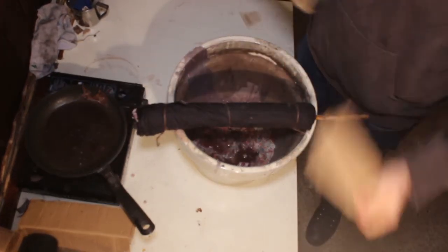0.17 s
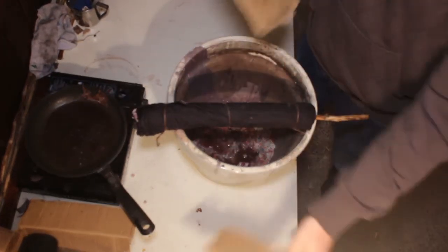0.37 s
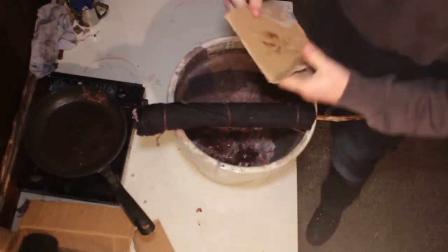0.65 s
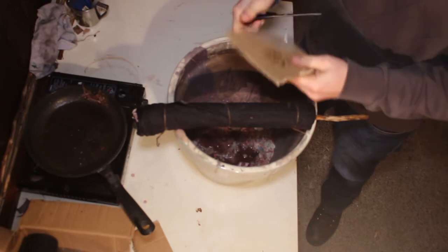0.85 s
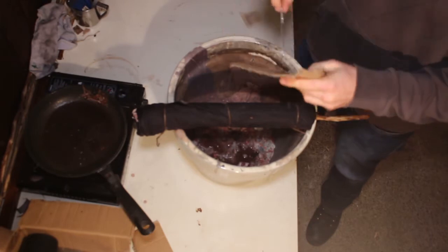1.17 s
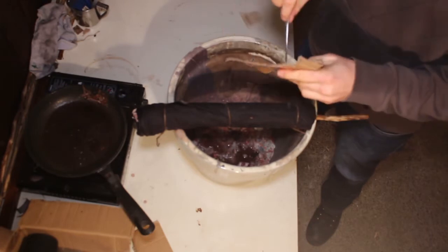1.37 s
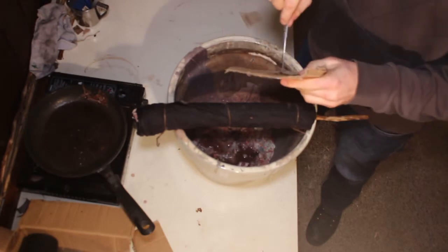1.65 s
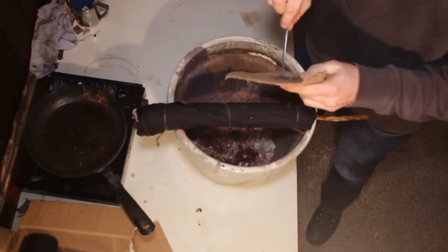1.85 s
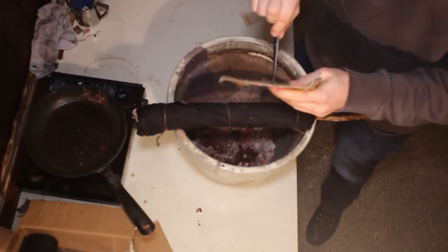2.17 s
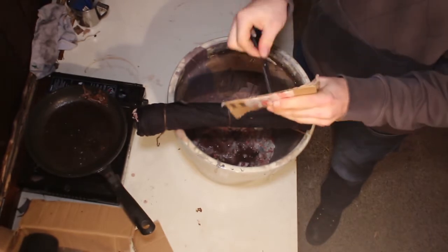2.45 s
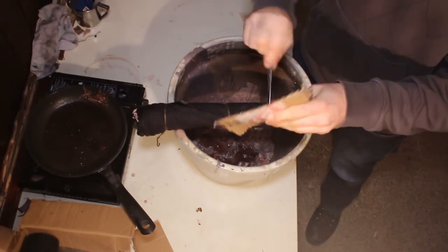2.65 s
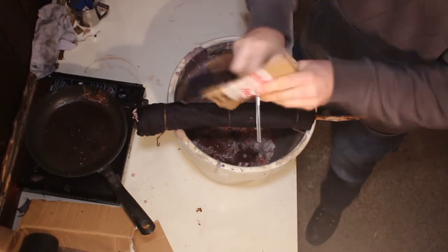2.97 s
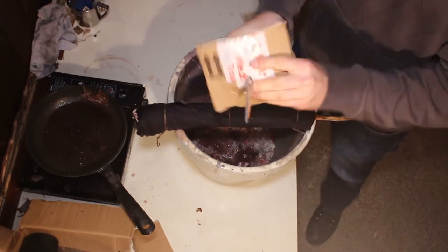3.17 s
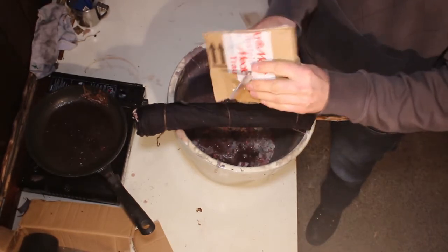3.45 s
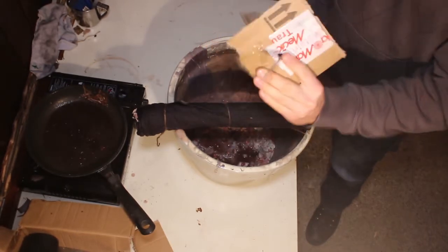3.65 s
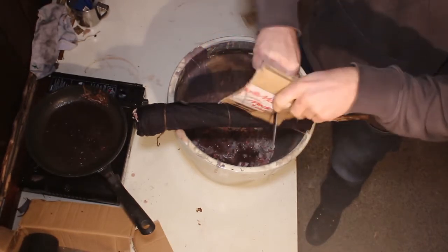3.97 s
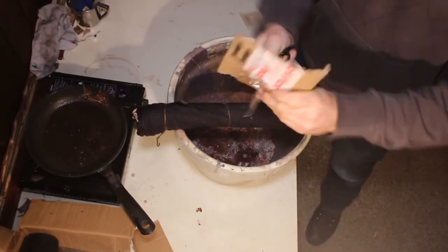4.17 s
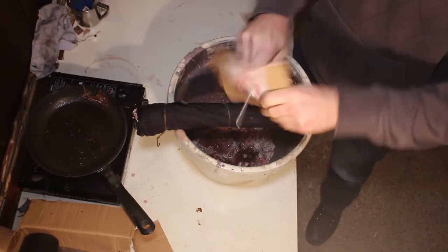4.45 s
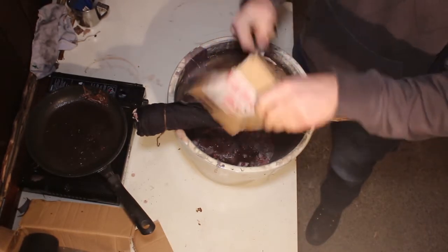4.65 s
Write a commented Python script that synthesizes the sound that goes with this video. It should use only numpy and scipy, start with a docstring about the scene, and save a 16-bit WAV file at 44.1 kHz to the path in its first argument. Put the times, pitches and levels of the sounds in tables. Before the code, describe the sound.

Abrupt cardboard rip and a knock, quiet handling, then a sharp knife stab punching through, followed by scratchy scrapes and small fibre snaps.

```python
"""A rip is heard first: a piece of hand-held corrugated cardboard is torn free by a knife, then tossed aside.
The point pricks the next, pops its liner, bursts through; the blade twists and is drawn out in short scrapes.
Fractures, friction and snapping fibres are shaped noise bursts driving board spectra; struck notes add pitch.
Decaying sines give the room's boom and wavering sines the faint ring of steel, over steady background noise.
A diffuse tail surrounds the board's sounds, as in a small, hard-walled room."""
import sys
import numpy as np
from scipy import signal
from scipy.fft import rfft, irfft
from scipy.io import wavfile
from scipy.ndimage import map_coordinates

SR = 44100
rng = np.random.default_rng(int(sys.argv[2]) if len(sys.argv) > 2 else 0)


def pcm_store(signal):
    """Save signal as 16-bit PCM."""
    levels = np.round(np.clip(np.atleast_2d(signal), -1, 1) * 32767)
    wavfile.write(sys.argv[1], SR, levels.astype(np.int16).T)


N = 212011

# Sudden fractures and knocks of the board; the layer levels are relative to strength_db:
# peak_s, rise_s, strength_db, flex_db, fibre_db, boom_db, note_db, note_hz
FRACTURES = [ (0.019, 0.022, -17, -12.5, 2.5, -1.5, 11.5, 607), (0.029, 0.016, -14, -32, -4, -11, 8.5, 226),
             (0.061, 0.013, -9, -12.5, -6, -13.5, -4.5, 524),
             (0.094, 0.016, -17, -17, -4, -14.5, -2.5, 1790), (0.551, 0.0012, -22, 4, -14, -4.5, 5, 263),
             (0.561, 0.00064, -28, 7, 8.5, -15, 9, 326), (0.590, 0.0018, -18, 3.5, 1, -6.5, 1, 1540),
             (0.608, 0.0026, -29, 5.5, -9, -7, 14.5, 324), (0.738, 0.00094, -29, 5.5, -1.5, -35, 2.5, 860),
             (1.304, 0.0028, -21.5, -3.5, -6.5, -30, -2.5, 940),
             (1.593, 0.014, -27, -7, -11.5, -41, 0, 970), (1.643, 0.0046, -36.5, 1.5, -18, -25, -2, 1070),
             (1.904, 0.0024, -34.5, -1.5, 1, -26.5, -1.5, 650),
             (2.078, 0.0011, -12.5, -4, -9, -13.5, 3, 880),
             (2.082, 0.0031, -19, -0.5, -0.5, -8.5, 10.5, 1293),
             (2.892, 0.0014, -26, -16, 0, -30, 0.5, 2960), (2.917, 0.004, -14, -8, -7, -24, -7, 1200),
             (2.926, 0.0029, -15.5, -6.5, -0.5, -20, 0.5, 1210),
             (2.947, 0.003, -4.5, -3, -5.5, -19, 2.5, 2400),
             (2.953, 0.0045, -4.5, -9, -4.5, -16.5, 2.5, 1470),
             (3.369, 0.0027, -35, -2, -1.5, -18, 3.5, 950), (3.579, 0.00077, -11, -6, -3, -30, 1, 1345),
             (3.822, 0.036, -25, -8, -3, -15, -2, 894), (3.832, 0.0045, -23.5, -7.5, -6, -22, 8.5, 1910),
             (4.050, 0.014, -40.5, 9, -6.5, -2, 3, 227), (4.403, 0.012, -26.5, -4.5, -8, -19, 2.5, 1650)]
# Blade or hand sliding on the board; brightness is positive for a light edge, negative for flat and heavy:
# peak_s, rise_s, strength_db, brightness_db
SCRAPES = [ (0.090, 0.048, -22.5, 1), (0.283, 0.03, -45.5, 3.5), (0.699, 0.034, -42, 1.5),
           (0.802, 0.064, -38, 1.5), (0.944, 0.06, -46, -0.5), (1.19, 0.061, -51, -5),
           (1.879, 0.066, -45, 5.5), (1.990, 0.065, -52.5, 0), (2.033, 0.013, -39.5, -2),
           (2.380, 0.14, -49.5, 3.5), (2.48, 0.025, -59, 10), (2.639, 0.020, -52.5, 3),
           (2.925, 0.010, -17.5, 2), (3.168, 0.03, -39.5, 0), (3.429, 0.0061, -49, -1),
           (3.471, 0.0043, -37.5, 3.5), (3.518, 0.027, -33.5, -2), (3.569, 0.033, -37, 1.5),
           (3.603, 0.011, -39.5, 7.5), (3.752, 0.0041, -39, -2), (3.790, 0.045, -36.5, -1.5),
           (4.070, 0.075, -38, -2), (4.141, 0.041, -32, 1.5), (4.180, 0.0082, -34, 2.5),
           (4.388, 0.052, -34.5, -15.5), (4.42, 0.0094, -44, -10), (4.597, 0.063, -30.5, -7.5),
           (4.638, 0.033, -32.5, -11)]
# Single fibres snapping against the steel: peak_s, strength_db, brightness_db
FIBRE_SNAPS = [ (2.124, -41, 4), (2.532, -42.5, -3.5), (2.674, -44.5, 4), (2.717, -43.5, 1),
               (2.810, -50, 2), (3.141, -45, 16.5), (3.201, -36, 3.5), (3.249, -34, 0), (3.283, -43, 5.5),
               (3.309, -42.5, -7), (3.541, -43, 7), (4.031, -38.5, -3.5), (4.351, -42.5, -25)]
# Resonances of the stiff corrugated panel: frequency_hz, width_hz, level_db
PANEL_MODES = [(464, 53.5, -1), (845, 98, -3), (1022, 137, -2.5), (1348, 112, -1), (1550, 125, -2.5),
               (1947, 450, -5), (2420, 700, -9), (3740, 420, -19)]
# Low resonances of the room: frequency_hz, mean_level_db, t60_s
ROOM_MODES = [(71, -14, 0.98), (127.9, 8, 0.34), (225.5, -6.5, 0.95), (324.7, -14.5, 0.45),
              (453.7, -11, 0.59), (543, -15.5, 0.97)]
# Relative spectrum of the flexing sheet: frequency_hz, density_db (per Hz)
FLEX_SPECTRUM = [(30, -14.5), (80, -5), (140, -3.5), (240, 1), (450, -7), (800, -19), (2000, -13.5),
                 (8000, -61)]
# Relative spectrum of the tearing fibres: frequency_hz, density_db (per Hz)
FIBRE_SPECTRUM = [(200, -58), (1000, -17), (2600, -1.5), (4500, -2.5), (6300, -5.5), (8200, -5.5),
                  (10000, -14.5), (13000, -10.5), (16000, -26)]
# Relative spectrum of the sliding steel: frequency_hz, density_db (per Hz)
HISS_SPECTRUM = [(500, -74), (3000, -13.5), (6000, -1.5), (8200, 0.5), (10500, -3), (13500, -1.5),
                 (16000, -10)]
# Relative spectrum of the quiet room: frequency_hz, density_db (per Hz)
AIR_SPECTRUM = [(15, -37), (25, -7), (166, -15.5), (236, -7), (277, -12), (607, -19), (1100, -23.5),
                (1650, -18.5), (2000, -20.5), (4140, -26.5), (6380, -30.5), (8140, -30), (16000, -34)]
# Decay time of the diffuse tail: frequency_hz, t60_s
ROOM_DECAY = [(100, 0.98), (260, 0.55), (700, 0.75), (1840, 0.66), (4850, 0.57), (8000, 0.38),
              (14000, 0.38)]
# Reflection from the walls: frequency_hz, reflected_db
WALL_REFLECTION = [(60, -2.5), (300, 3.5), (1500, 1), (4000, 1), (8000, 4), (15000, -3)]
# Faint ring of the steel: frequency_hz, relative_level_db
BLADE_MODES = [(1680, -62.5), (1703, -68), (1745, -62.5), (3984, -70), (4522, -84), (7235, -77)]

TOP_HZ = 16200  # upper band limit
LENGTH = 40000  # samples in each event
T = np.arange(LENGTH) / SR  # s
HZ = np.fft.rfftfreq(LENGTH, 1 / SR)

# Release: t60 (s) as the rise tends to zero; added seconds per second of rise
FRACTURE_T60_S, FRACTURE_LINGERS = 0.027, 3.4
SCRAPE_T60_S, SCRAPE_LINGERS = 0.12, 0.78
# Layer levels against the fibres, at zero brightness
SCRAPE_FLEX_DB, SCRAPE_PANEL_DB, SCRAPE_HISS_DB = -9.5, -2.5, -5.5
SNAP_PANEL_DB, SNAP_HISS_DB = -2, 2
# The small patch sends less into the room than the whole sheet
SHEET_WET_DB, NOTE_WET_DB = -6, -10
NOTE_Q = 7  # sharpness of the strained patch's note
BODY_FALLS, HISS_GROWS, TREBLE_GROWS = 0.21, 1.44, 0.52  # dB per dB of brightness
TREBLE_HZ = 6220  # above this the fibres follow the brightness
SNAP_T60_S, SNAP_SHORTENS = 0.039, 0.57  # t60 at zero brightness; dB of length lost per dB of brightness


def fractures(flex, panel, fibre):
    """Sudden release of strain: sheet flexes, panel cracks, the patch round the point rings; slow ones linger."""
    out = np.zeros(N)
    for peak_s, rise, strength_db, flex_db, fibre_db, boom_db, note_db, note_hz in FRACTURES:
        force = stroke(rise, FRACTURE_T60_S + FRACTURE_LINGERS * rise)
        layers = [(flex_db, flex), (0, panel), (fibre_db, fibre)]
        sheet = sum(amp(db) * crackle(force, response, rate=3000, rub=0.21) for db, response in layers)

        patch = resonant([(note_hz, note_hz / NOTE_Q, 0)])
        note = amp(note_db) * crackle(force, patch, rate=2500, rub=0.19)

        boom = amp(boom_db) * room_boom() * np.minimum(T / (rise + 0.011), 1)
        heard = in_room(sheet, SHEET_WET_DB) + in_room(note, NOTE_WET_DB) + boom
        add(out, peak_s - rise, amp(strength_db) * heard)
    return out


def scrapes(flex, panel, fibre, hiss, slip_rate=170, slip_db=2.0):
    """Stick-slip friction: sliding over flutes comes in clumps; a lighter touch trades body for treble."""
    out = np.zeros(N)
    treble = 1 / (1 + (TREBLE_HZ / (HZ + 1)) ** 10)
    for peak_s, rise, strength_db, bright_db in SCRAPES:
        # Smooth random friction, slip_rate new values a second
        slips = map_coordinates(rng.standard_normal(LENGTH // 10), [T * slip_rate])
        pressure = stroke(rise, SCRAPE_T60_S + SCRAPE_LINGERS * rise)
        force = pressure * amp(slip_db * (slips + 0.95))

        body_db = -BODY_FALLS * bright_db
        tilted_fibre = fibre * amp(TREBLE_GROWS * bright_db * treble)
        layers = [
            (SCRAPE_FLEX_DB + body_db, flex),
            (SCRAPE_PANEL_DB + body_db, panel),
            (0, tilted_fibre),
            (SCRAPE_HISS_DB + HISS_GROWS * bright_db, hiss),
        ]
        direct = sum(amp(db) * crackle(force, response, rate=2100, rub=0.58) for db, response in layers)
        add(out, peak_s - rise, amp(strength_db) * in_room(direct, wet_db=-7.5))
    return out


def fibre_snaps(panel, fibre, hiss, rise=0.0014):
    """Impulsive excitation: fibres snap at the edge of the hole; the brighter the snap, the shorter."""
    out = np.zeros(N)
    for peak_s, strength_db, bright_db in FIBRE_SNAPS:
        force = stroke(rise, SNAP_T60_S * amp(-SNAP_SHORTENS * bright_db))
        layers = [
            (SNAP_PANEL_DB - BODY_FALLS * bright_db, panel),
            (0, fibre),
            (SNAP_HISS_DB + HISS_GROWS * bright_db, hiss),
        ]
        direct = sum(amp(db) * crackle(force, response, rate=1300, rub=0.033) for db, response in layers)
        add(out, peak_s - rise, amp(strength_db) * in_room(direct, wet_db=-4.5))
    return out


def blade(waver_rate=35, waver_db=3.0):
    """Modal vibration: the steel sings faintly and unevenly as its point is set on the board."""
    out = np.zeros(N)

    def waver():
        """Smooth random modulation, waver_rate new values a second."""
        return map_coordinates(rng.standard_normal(LENGTH // 10), [T * waver_rate])

    ring = 0
    for hz, db in BLADE_MODES:
        level = amp(db + 7.5 + waver_db * waver())
        ring = ring + level * np.sin(2 * np.pi * hz * T + waver())
    fade = 1 - (T / T[-1]) ** 2
    add(out, 1.15, ring * stroke(0.041, 14.0) * fade)
    return out


def room_boom():
    """Room modes: low standing waves decay exponentially, with random phases and slightly varied levels."""
    boom = 0
    for hz, db, t60 in ROOM_MODES:
        level = amp(db + rng.normal(0, 1.0) - 60 * T / t60)
        boom = boom + level * np.sin(2 * np.pi * (hz * T + rng.random()))
    return boom


def in_room(x, wet_db, gap=0.0012):
    """Diffuse reverberation: a noise tail, building up over gap seconds, decays at its own rate in each band."""
    hz, t, z = signal.stft(rng.standard_normal(LENGTH), SR, nperseg=256)
    decay = amp(-60 * t / along(ROOM_DECAY, hz)[:, None])
    tail = signal.istft(z * decay, SR, nperseg=256)[1][:LENGTH]
    tail = tail * np.minimum(T / gap, 1) ** 2
    tail = irfft(rfft(sized(tail, 0.94)) * causal(WALL_REFLECTION))
    return x + amp(wet_db) * signal.fftconvolve(x, tail)[:LENGTH]


def air(level_db=-52):
    """Stationary noise: random pressure with a fixed spectrum forms the steady background of the room."""
    spectrum = amp(along(AIR_SPECTRUM, np.fft.rfftfreq(N, 1 / SR)))
    noise = irfft(rfft(rng.standard_normal(N)) * spectrum, N)
    return amp(level_db) * noise / noise.std()


def crackle(force, response, rate, rub):
    """Random excitation: breaks, rate a second, over smooth rubbing drive a response; energy follows force."""
    breaks = rng.random(LENGTH) < rate / SR
    drive = rng.standard_normal(LENGTH) * (breaks + rub) * force
    return sized(irfft(rfft(drive) * response), force)


def stroke(rise, t60):
    """Loading and release: force grows quadratically for rise seconds, then decays exponentially."""
    return np.minimum(T / rise, 1) ** 2 * amp(-60 * np.maximum(T - rise, 0) / t60)


def resonant(modes):
    """Modal superposition: damped resonances (Hz, width, dB) sum with alternating signs."""
    response = 0
    for k, (f, width, db) in enumerate(modes):
        damping = 1j * HZ * width
        response = response + (-1) ** k * amp(db) * damping / (f * f - HZ * HZ + damping)
    return response


def causal(points):
    """Minimum phase: folding the cepstrum gives the causal response of a magnitude spectrum."""
    cepstrum = irfft(np.log(amp(along(points, HZ))))
    cepstrum[1:LENGTH // 2] *= 2
    cepstrum[LENGTH // 2 + 1:] = 0
    return np.exp(rfft(cepstrum))


def along(points, hz):
    """Logarithmic frequency scale: (Hz, value) points are interpolated on it."""
    f, v = np.transpose(points)
    return np.interp(np.log(hz + 1), np.log(f + 1), v)


def amp(db):
    """Level law: decibels become an amplitude ratio."""
    return 10 ** (np.asarray(db) / 20)


def sized(x, like):
    """Energy normalisation: x is given the energy of another signal."""
    return x * np.linalg.norm(like) / (np.linalg.norm(x) + 1e-12)


def add(track, start_s, x):
    """Superposition: x is summed into the track from start_s on."""
    start = round(start_s * SR)
    x = x[max(-start, 0):N - start]
    track[max(start, 0):][:len(x)] += x


def scene():
    """Superposition of all sounds of knife, board and room at one point."""
    flex, panel = causal(FLEX_SPECTRUM), resonant(PANEL_MODES)
    fibre, hiss = causal(FIBRE_SPECTRUM), causal(HISS_SPECTRUM)
    board = fractures(flex, panel, fibre)
    board += scrapes(flex, panel, fibre, hiss)
    board += fibre_snaps(panel, fibre, hiss)
    return (board + blade() + air())[None]


def record(dry):
    """Saturation and band limiting: peaks bend smoothly towards full scale, then a steep low-pass follows."""
    clipped = dry / (1 + np.abs(dry) ** 8) ** (1 / 8)
    low_pass = signal.ellip(10, 0.1, 80, TOP_HZ, fs=SR, output="sos")
    return signal.sosfilt(low_pass, clipped)


dry = scene()
out = record(dry)
pcm_store(out)
```